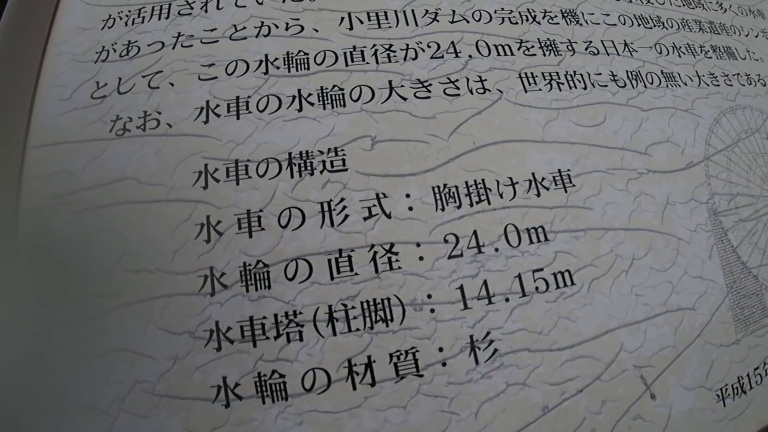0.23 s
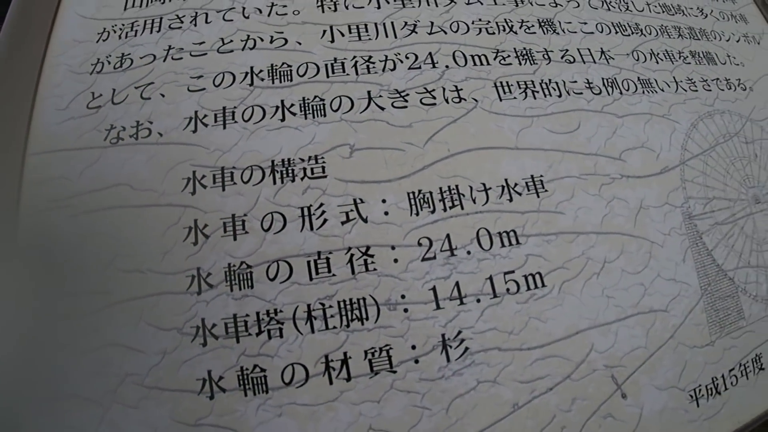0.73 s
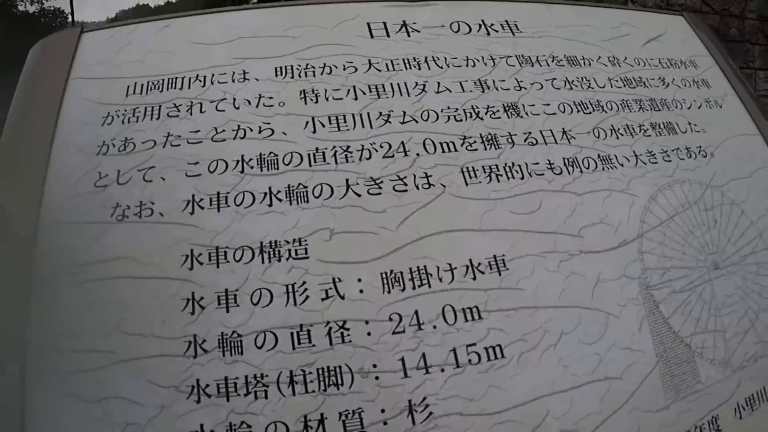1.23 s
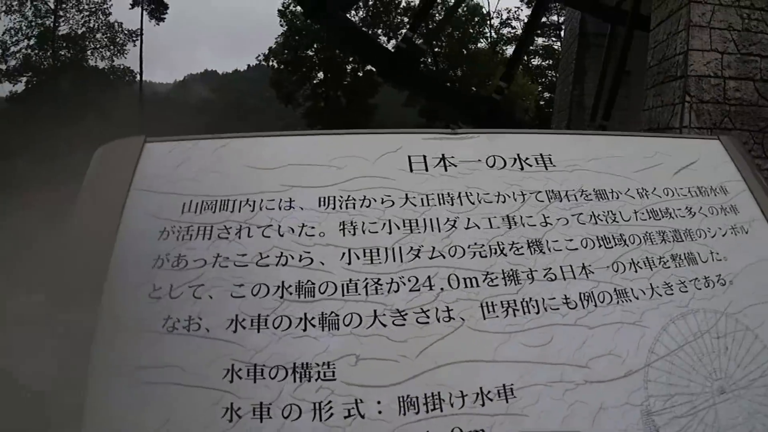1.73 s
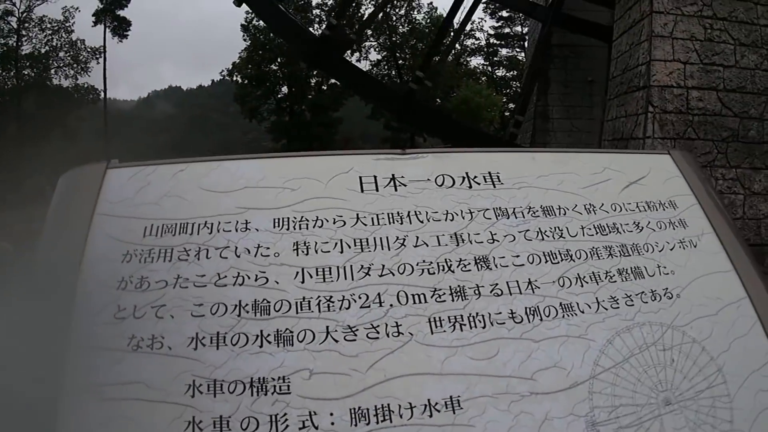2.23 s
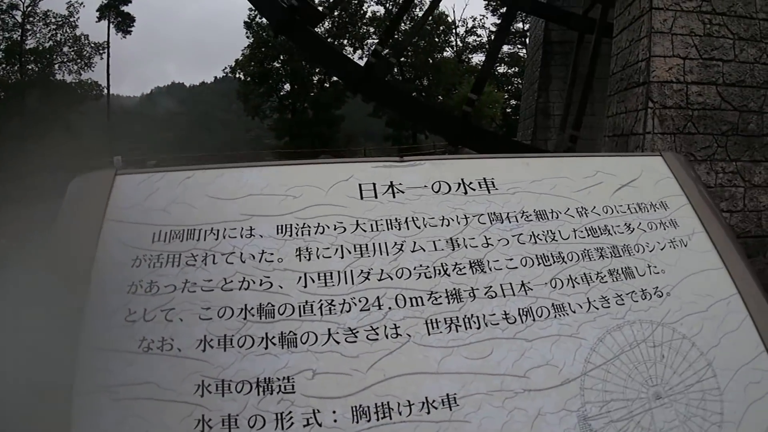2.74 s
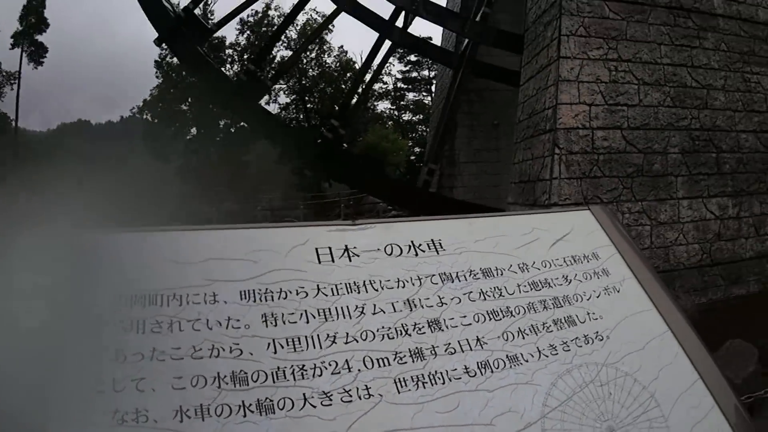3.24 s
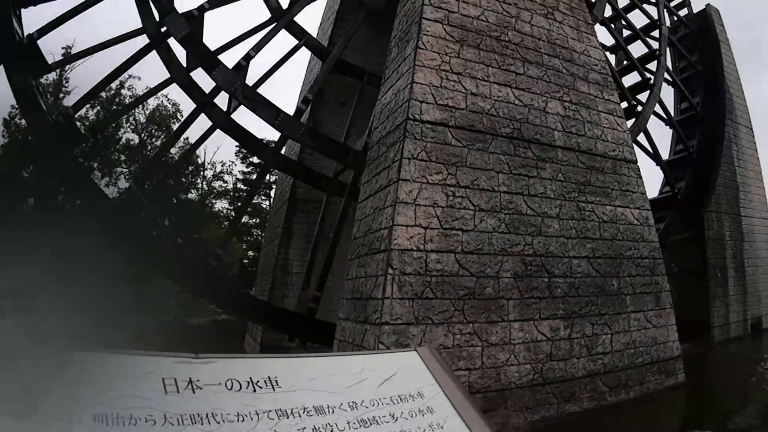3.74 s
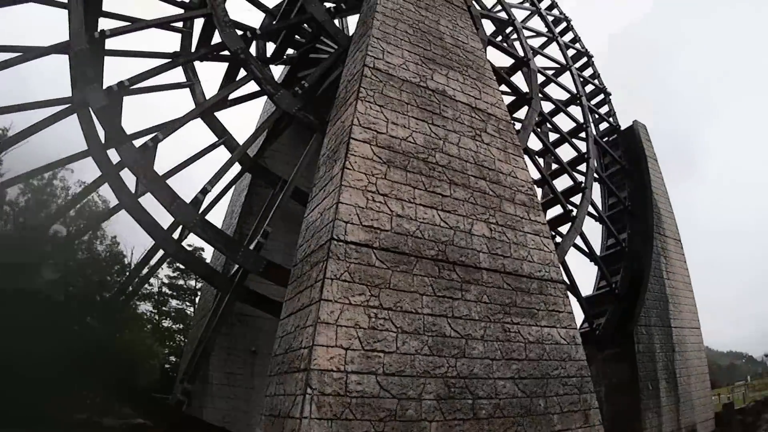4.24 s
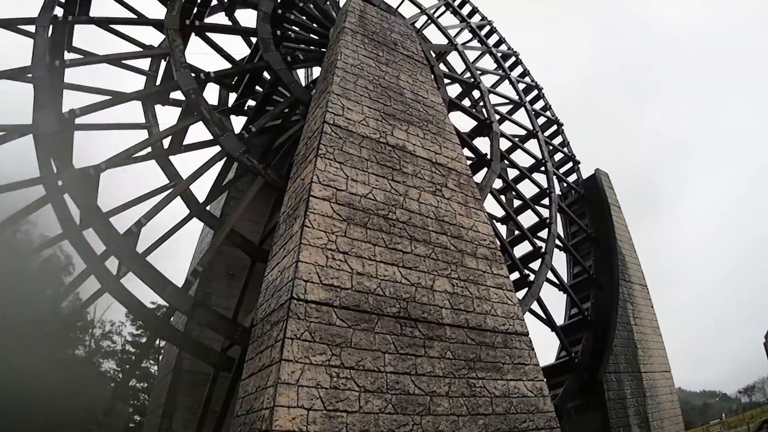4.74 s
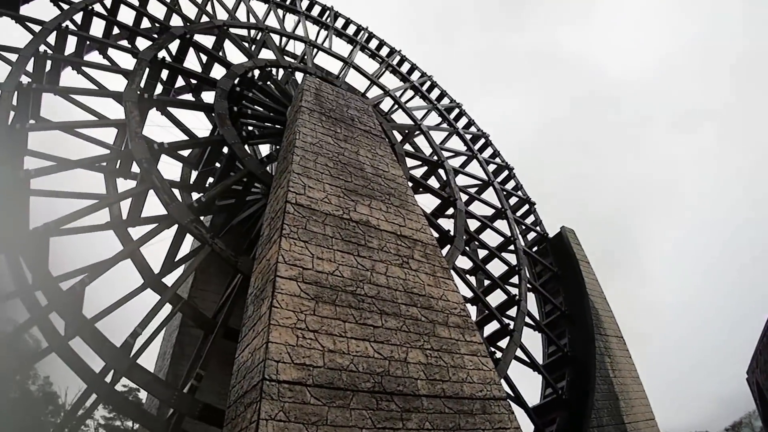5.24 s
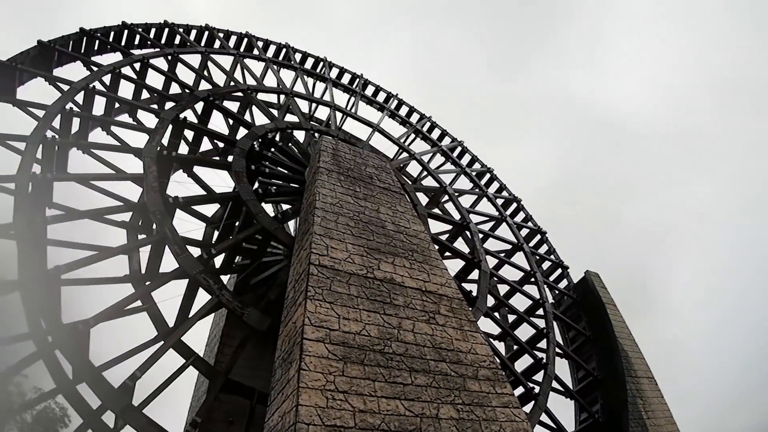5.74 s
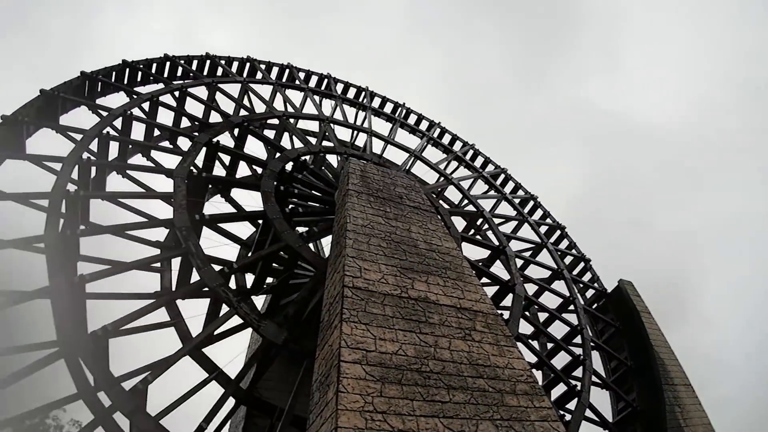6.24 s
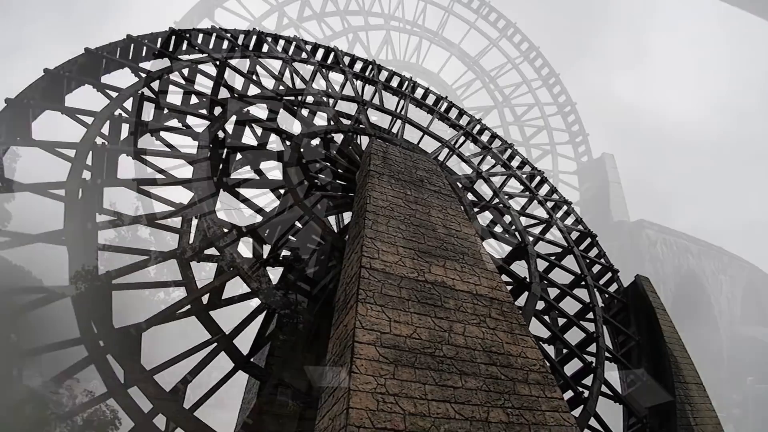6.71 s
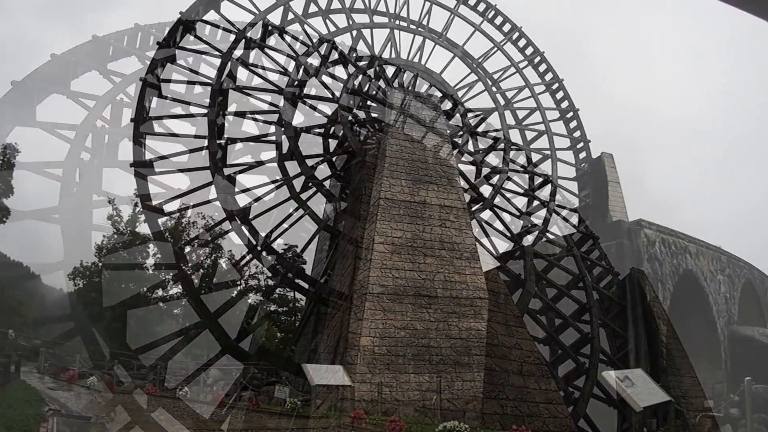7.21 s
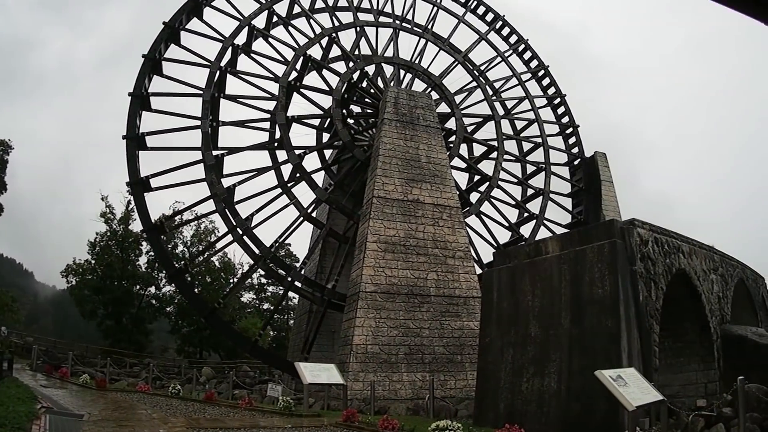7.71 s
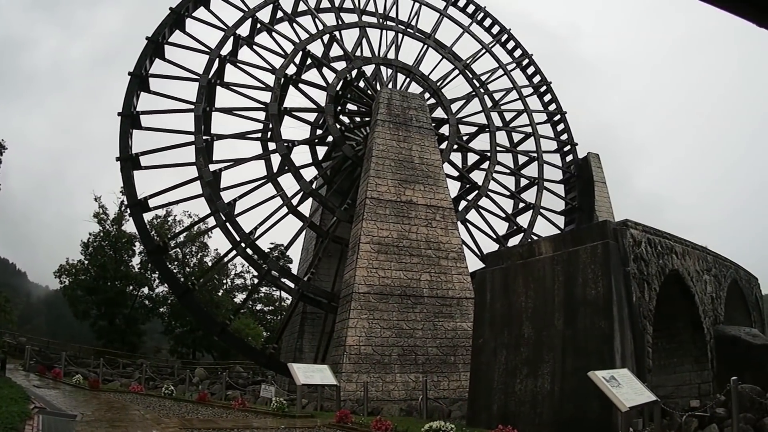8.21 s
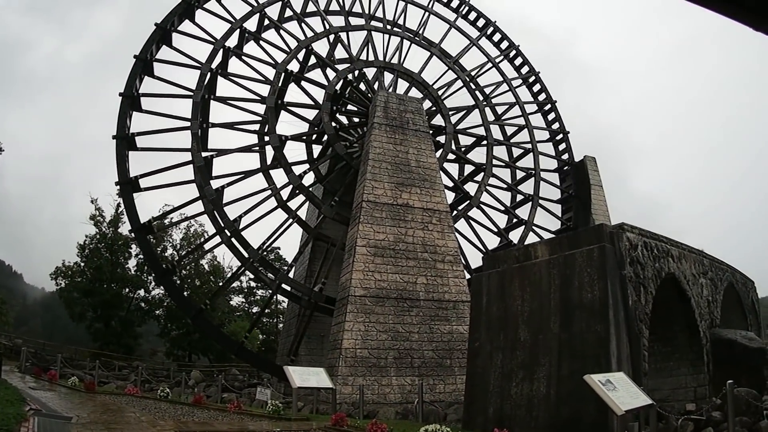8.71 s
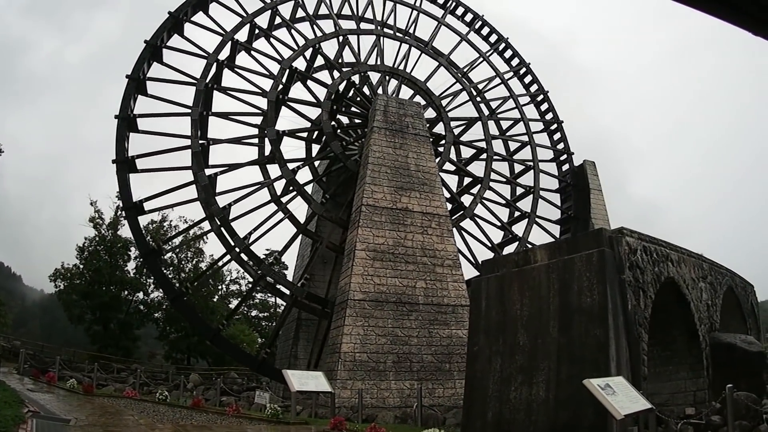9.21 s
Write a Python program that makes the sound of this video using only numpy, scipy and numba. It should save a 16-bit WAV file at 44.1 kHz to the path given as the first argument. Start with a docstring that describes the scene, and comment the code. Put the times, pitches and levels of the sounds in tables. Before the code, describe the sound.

Water rushes loudly over a giant wooden waterwheel, bucket splashes pulsing three times a second, cutting out briefly near seven seconds, then resuming duller and farther away.

```python
"""A dense rush of drops and bubbles, with a bucket splash about three times a second, over a low hum.
Water pours over a giant wooden waterwheel, heard from behind a signboard, under the wheel, then further off.
The rush is shaped noise, impacts and ringing bubbles; a few big bubbles gulp as gliding tones.
Low noise gusts buffet the microphone ports, and short ticks of stray drops on the case duck a limiter.
The sound drops out briefly, then fades in from further off."""
import sys
import numpy as np
from scipy import signal
from scipy.fft import rfft, irfft
from scipy.io import wavfile
from numba import njit

SR = 44100
rng = np.random.default_rng(int(sys.argv[2]) if len(sys.argv) > 2 else 0)


def file_out(sig):
    """Save sig as 16-bit WAV at sys.argv[1]."""
    # one column per channel
    cols = np.atleast_2d(sig).T
    # limit, then scale
    lim = np.clip(cols, -1, 1)
    pcm = np.round(lim * 32767).astype(np.int16)
    wavfile.write(sys.argv[1], SR, pcm)


N = 417186
T = np.arange(N) / SR
HZ = np.maximum(np.fft.rfftfreq(N, 1 / SR), 1)
CUT_S, RESUME_S = 7.0655, 7.187  # dropout


def undb(db):
    """Decibels to gain."""
    return 10 ** (np.asarray(db) / 20)


def curve(rows):
    """Join (time [s], value) rows by straight lines."""
    return np.interp(T, *np.transpose(rows))


def colour(hz, db):
    """Gain at every frequency, dB interpolated over log frequency."""
    return undb(np.interp(np.log(HZ), np.log(hz), db))


def unit(x):
    """Scale to standard deviation 1."""
    return x / np.std(x)


def walk(rate_hz):
    """Smooth random signal of spread 1, changing about rate_hz times a second."""
    bin_hz = np.arange(len(HZ)) * SR / N
    lowpass = 1 / (1 + (bin_hz / rate_hz) ** 4)
    return unit(irfft(rfft(rng.standard_normal(N)) * lowpass, N))


def drops(rate_hz, spread_db):
    """Impacts at random moments, a few large among many small."""
    size = undb(spread_db * np.minimum(rng.exponential(size=N), 4))
    hits = rng.random(N) < rate_hz / SR
    return unit(hits * size * rng.choice([-1, 1], N))


def bubbles(rate_hz, cycles, count=24):
    """Bubbles of many sizes ring for some cycles, rising in pitch; their sum is about white."""
    out = np.zeros(N)
    for hz in np.geomspace(600, 5000, count):
        age_s = np.arange(int(cycles * SR / hz)) / SR
        life = age_s * hz / cycles  # 0 to 1
        decay = np.exp(-np.log(100) * life)
        ring = np.sin(2 * np.pi * hz * age_s * (1 + .08 * life)) * decay
        band = signal.oaconvolve(drops(rate_hz, spread_db=4), ring)[:N]
        out += np.sqrt(hz) * unit(band)
    return unit(out)


def splashes(rise_s, fall_s, count=24):
    """Envelope of buckets emptying at the wheel's pace: each lands quickly, then patters out."""
    # wheel timing before and after the dropout: (first splash [s], bucket period [s])
    near_buckets = (0.2004, .346)
    far_buckets = (7.565, .296)
    # how hard bucketfuls land: (time [s], envelope level [dB])
    landing = [(0.2, -.3), (1.7, -5.5), (2.6, -2.3), (3.2, -4), (3.9, .5), (5.5, 0), (6.9, -4.5), (9.4, -4)]
    # uneven turning makes the near buckets drift early and late
    sway_s, sway_period_s, latest_at_s = 0.023, 6.5, 5.6
    fill_spread_db = .8
    near, far = (first + period * np.arange(count) for first, period in (near_buckets, far_buckets))
    near = near + sway_s * np.cos(2 * np.pi * (near - latest_at_s) / sway_period_s)
    times_s = np.r_[near[near < CUT_S], far[far < T[-1]]]
    fills = undb(fill_spread_db * rng.standard_normal(2 * count))
    power = np.zeros(N)
    for start_s, fill in zip(times_s, fills):
        age_s = T - start_s
        rise = np.exp(-(age_s / rise_s) ** 2)
        fall = np.exp(-np.abs(age_s) / fall_s)
        power += fill ** 2 * np.where(age_s < 0, rise, fall)
    return np.sqrt(power) * undb(curve(landing))


def water(splash, churn, splash_hz=2800):
    """Spectrum of one patch of falling water: churning hiss, drops, bubbles and bright splashes."""
    hiss = 0.78 * rng.standard_normal(N)
    patter = .46 * drops(6000, spread_db=3.0)
    steady = hiss + patter + 0.17 * bubbles(30, cycles=19.3)
    spray = 1.18 * splash * drops(9000, spread_db=3.2)
    highpass = 1 / (1 + (splash_hz / HZ) ** 4) ** .5
    return rfft(steady * churn) + rfft(spray) * highpass


def presence():
    """Weight of each standpoint: sign crossfades to wheel, then further off after the dropout."""
    step_mid_s, step_length_s = 3.4, 0.76
    stepped = np.clip((T - step_mid_s) / step_length_s + .5, 0, 1)
    far = T > RESUME_S
    return np.array([1 - stepped, stepped * ~far, far])


def waterwheel():
    """Water arrives straight from the wheel and, scattered by stone and spokes, from all round."""
    # rush before resonances and flow:
    # (frequency [Hz], behind sign [dB per Hz], under wheel [dB per Hz], far off [dB per Hz])
    rush = [(30, -80, -74.5, -89), (60, -71, -76, -69.5), (275, -68.5, -67.0, -69.5),
            (404, -74.5, -73, -76.5), (532, -67, -69.5, -73), (703, -66.0, -59.5, -70),
            (895, -61.5, -57.5, -66), (1144, -61.5, -62.0, -64.5), (1406, -65.5, -64, -70.5),
            (2420, -64.5, -65, -72.5), (5050, -64, -65, -73), (8000, -65.0, -66, -77.0),
            (12500, -64.5, -67.5, -78), (15500, -75.5, -72.5, -86.0)]
    # standpoints in that order: (left port lag [ms], direct power share [0-1], direct sound lost above [Hz])
    standpoints = [(0.071, 0.6, 21000), (.054, 0.53, 9900), (0.016, 0.2, 11000)]
    # colouring resonances: (centre [Hz], width [Hz], behind sign [dB], under wheel [dB], far off [dB])
    resonances = [(1130, 160, 2, -1, -1.5), (1612, 217, 6.5, 4.5, 0.5), (2070, 260, 1, 2, 1.5),
                  (3160, 360, 4.5, 3.5, 6), (6270, 1100, 4.5, 4.5, 5)]
    # port balance: (frequency [Hz], left minus right [dB])
    balance_db = [(60, -2.5), (700, 0.2), (1300, -2), (2400, -3.5), (4400, -3), (8100, -2.5), (15000, 0.5)]
    # port mismatch: (frequency [Hz], extra left lag [rad])
    port_phase = [(750, 0.032), (1050, 0.19), (1450, 0.72), (2100, 0.21), (2800, 0.21), (3700, 0)]
    # slow swell of the rush, before a constant trim: (time [s], level [dB])
    flow = [(0, 0.45), (2.2, 0.1), (2.9, 1.06), (4.3, 1.3), (5.3, -0.2), (6.4, 0.83), (7.6, 0.4),
            (8.2, 0.75), (9.4, 0.8)]
    flow_trim_db = -0.51

    clumps = undb(1.0 * walk(60))  # each bucketful falls in clumps
    splash = splashes(rise_s=.026, fall_s=0.041) * clumps
    churn = undb(0.4 * walk(6.3) + 0.32 * walk(45))
    direct, around, across = (water(splash, churn) for _ in range(3))

    sides = np.array([[1], [-1]])  # left, right
    likeness = np.sinc(HZ / 5200) / (1 + (HZ / 5000) ** 2)  # long waves reach both ports alike
    common = around * np.sqrt((1 + likeness) / 2)
    opposed = across * np.sqrt((1 - likeness) / 2)
    diffuse = common + sides * opposed
    mismatch = np.exp(-.5j * sides * np.interp(HZ, *np.transpose(port_phase)))
    balance = mismatch * colour(*np.transpose(balance_db)) ** (sides / 2)

    weights = presence()
    hz, *spectra_db = np.transpose(rush)
    out = 0
    for k, (lag_ms, direct_share, lost_hz) in enumerate(standpoints):
        ringing_db = sum(dbs[k] / (1 + (2 * (HZ - centre) / width) ** 2)
                         for centre, width, *dbs in resonances)
        share = direct_share / (1 + (HZ / lost_hz) ** 8)
        port_lag = np.exp(-1j * np.pi * HZ * sides * lag_ms / 1000)
        field = np.sqrt(share) * direct * port_lag + np.sqrt(1 - share) * diffuse
        shaped = field * balance * undb(ringing_db) * colour(hz, spectra_db[k])
        out = out + weights[k] * irfft(shaped, N)
    return out * np.sqrt(SR / 2) * undb(curve(flow) + flow_trim_db)  # sqrt: dB per Hz to amplitude


def gulps(cycles=9, glide=0.034):
    """A big bubble in the pool swells, rings for some cycles and rises a little in pitch."""
    # bursting bubbles: (time [s], peak [dB], starting pitch [Hz])
    bursts = [(3.023, -22, 1026), (5.994, -23, 950), (6.172, -19, 1014), (7.775, -32, 1210),
              (8.985, -31, 1840), (9.03, -30, 1360)]
    out = np.zeros(N)
    age_s = np.arange(SR // 10) / SR
    for start_s, db, hz in bursts:
        life, start = age_s * hz / cycles, int(start_s * SR)
        swell = 2 * life * np.exp(1 - 2 * life)  # peak 1
        ring = np.sin(2 * np.pi * hz * age_s * (1 + glide * life))
        out[start:start + len(age_s)] += undb(db) * swell * ring
    return out


def wind(low_hz=55, high_hz=190, breeze_db=-58, buffet_db=4, eddies_per_s=20):
    """Gusts shed eddies: low noise that buffets each port independently, over a faint breeze."""
    # gusts before buffeting: (time [s], half length to 1/e [s], left [dB], right [dB])
    gusts = [(1.0, 0.055, -43.5, -35), (1.45, 0.39, -44, -43), (2.4, 0.29, -41, -40.5),
             (2.466, .04, -32, -24.5), (3.938, 0.06, -27.5, -46), (4.21, .1, -25.5, -48),
             (4.423, 0.063, -31, -32)]
    band = 1 / np.sqrt((1 + (low_hz / HZ) ** 6) * (1 + (HZ / high_hz) ** 8))
    eddies = []
    for _ in range(2):
        rumble = irfft(rfft(rng.standard_normal(N)) * band, N)
        eddies.append(unit(rumble * undb(buffet_db * walk(eddies_per_s))))
    force = sum(undb(dbs)[:, None] * np.exp(-((T - mid_s) / half_s) ** 2)
                for mid_s, half_s, *dbs in gusts)
    return np.array(eddies) * (force + undb(breeze_db))


def strikes(ring_hz=6300, decay_s=0.00025, left_db=-6):
    """A stray drop on the case gives one hard, very short tick, nearer the right port."""
    # drops on the case: (time [s], right port peak before the limiter [dB])
    hits = [(1.9212, -12), (2.2358, -12), (3.649, 6), (5.028, -1)]
    tick = np.zeros(N)
    age_s = np.arange(SR // 100) / SR
    ring = np.cos(2 * np.pi * ring_hz * age_s) * np.exp(-age_s / decay_s)
    for start_s, db in hits:
        start = int(start_s * SR)
        tick[start:start + len(age_s)] += undb(db) * ring
    return tick * np.array([[undb(left_db)], [1]])


def hum():
    """A low sine that wavers in pitch and strength."""
    hum_hz, waver_hz = 73.4, 1.7
    rms_db, waver_db = -53.2, 2.5
    phase = 2 * np.pi * np.cumsum(hum_hz + waver_hz * walk(3.76)) / SR
    return np.sqrt(2) * np.sin(phase) * undb(rms_db + waver_db * walk(2.8))


def scene():
    """Water, gulps, wind, hum and stray drops together."""
    return waterwheel() + gulps() + wind() + hum() + strikes()


@njit
def limiter(peak, ceiling, release_s):
    """Gain that drops at once under a peak and creeps back."""
    gain, g = np.empty(len(peak)), 1.
    for i in range(len(peak)):
        recovered = g + (1 - g) / (release_s * SR)
        g = min(recovered, ceiling / (peak[i] + 1e-9))
        gain[i] = g
    return gain


def record(dry):
    """Limit both ports together, drop out and fade back in, then low-pass the whole."""
    ramp_s, top_hz = 0.62, 15900  # time of a full 0-1 ramp; low-pass edge
    held = dry * limiter(np.abs(dry).max(axis=0), ceiling=.82, release_s=0.11)
    closing = np.exp(-np.maximum(T - CUT_S, 0) / 0.003)
    opening = (T > RESUME_S) * np.clip(0.16 + (T - RESUME_S) / ramp_s, 0, 1)  # starts at 0.16
    lowpass = signal.ellip(12, .1, 80, top_hz, fs=SR, output="sos")
    return signal.sosfilt(lowpass, held * (closing + opening))


dry = scene()
out = record(dry)
file_out(out)
```